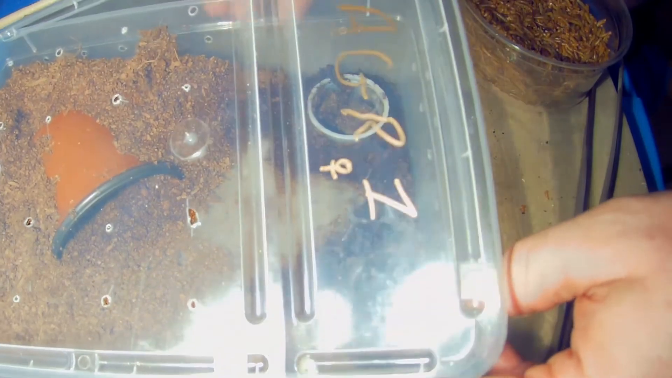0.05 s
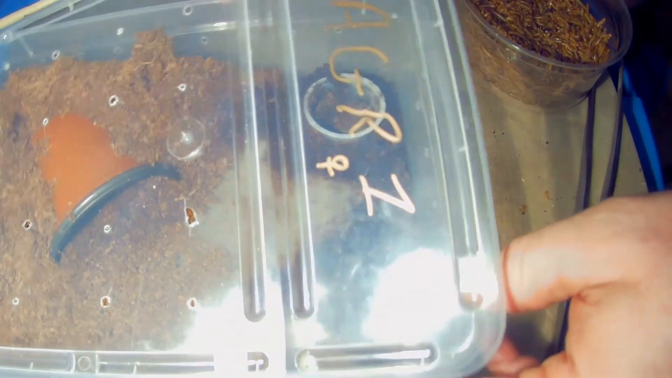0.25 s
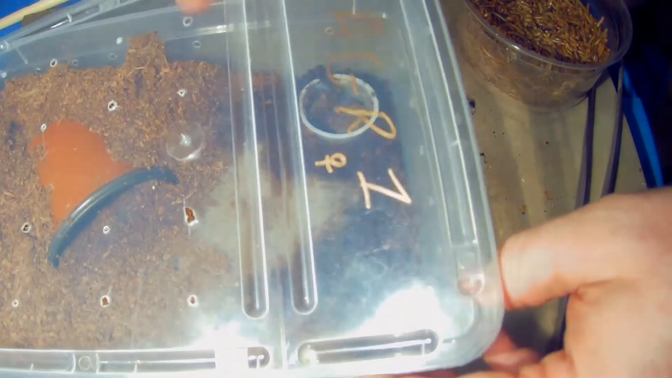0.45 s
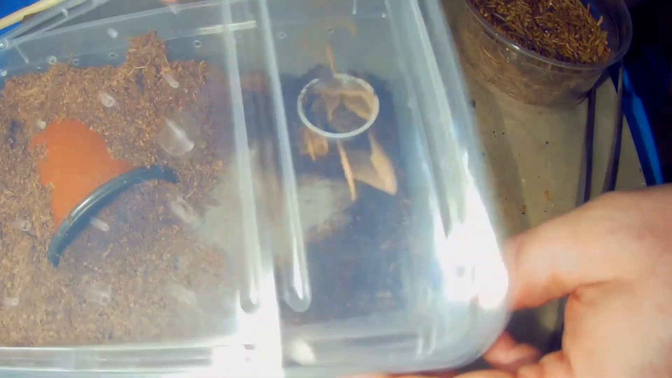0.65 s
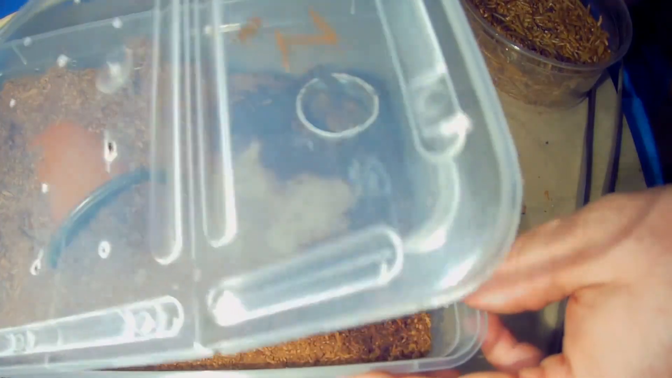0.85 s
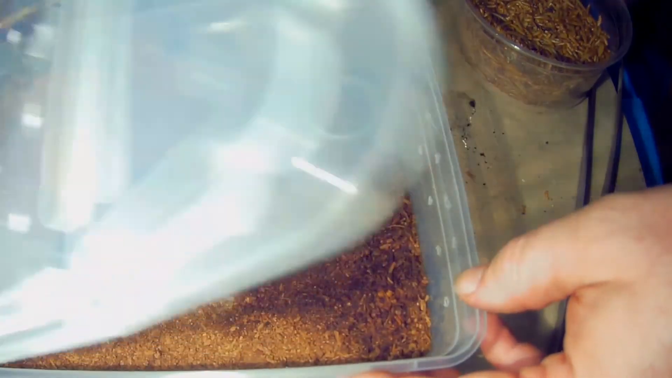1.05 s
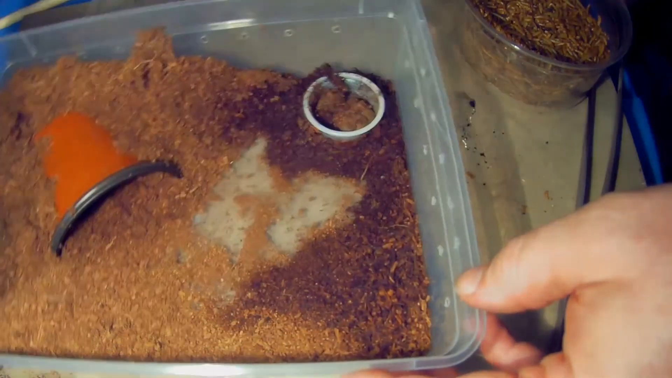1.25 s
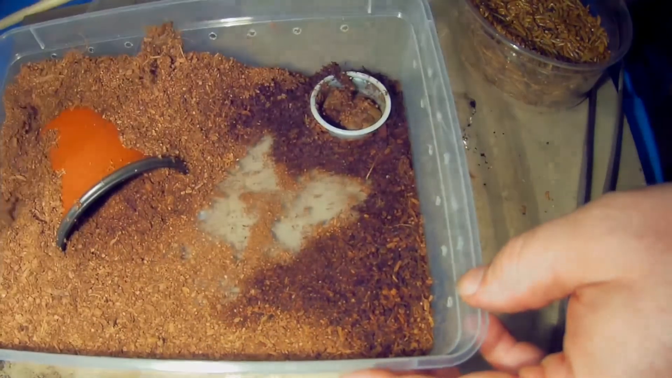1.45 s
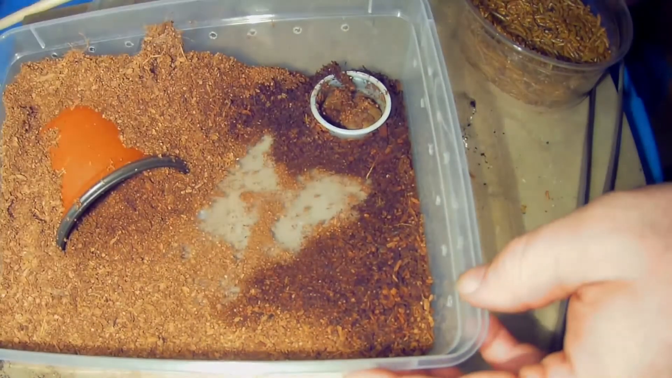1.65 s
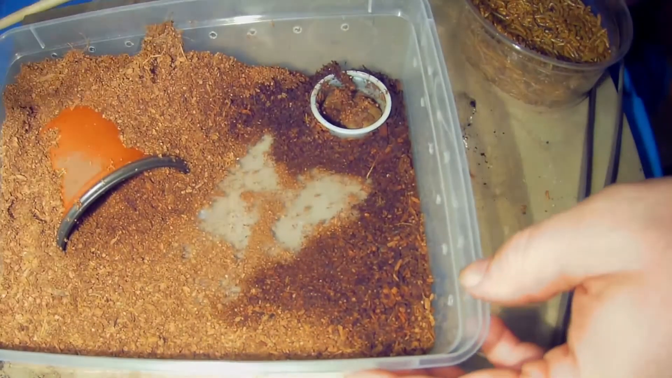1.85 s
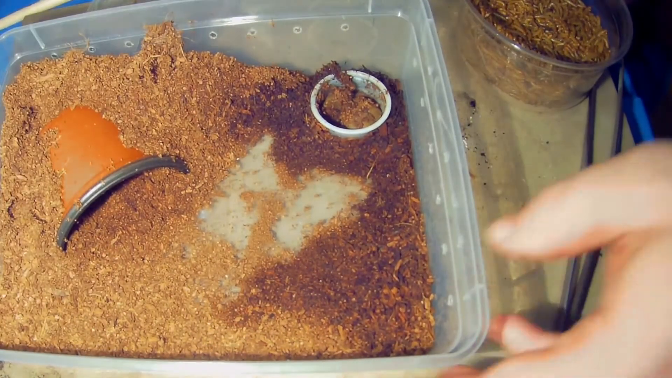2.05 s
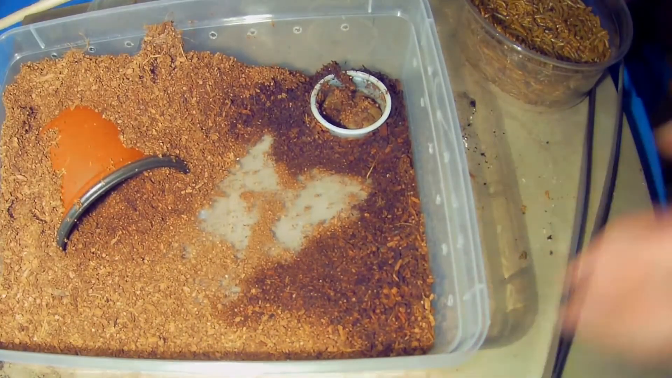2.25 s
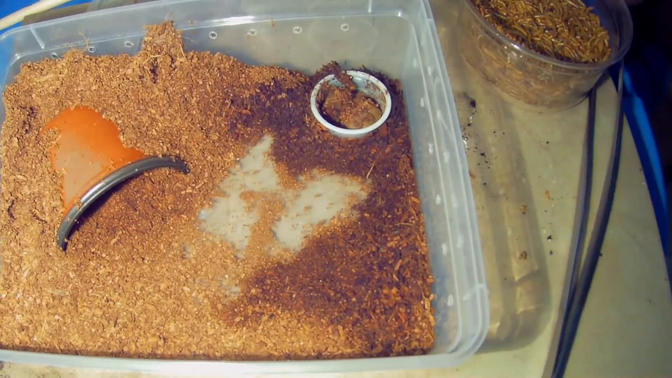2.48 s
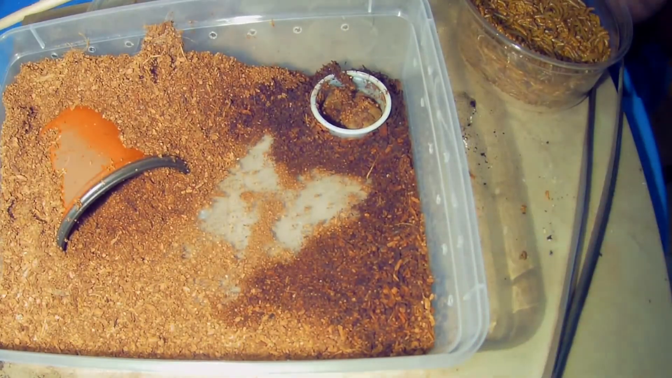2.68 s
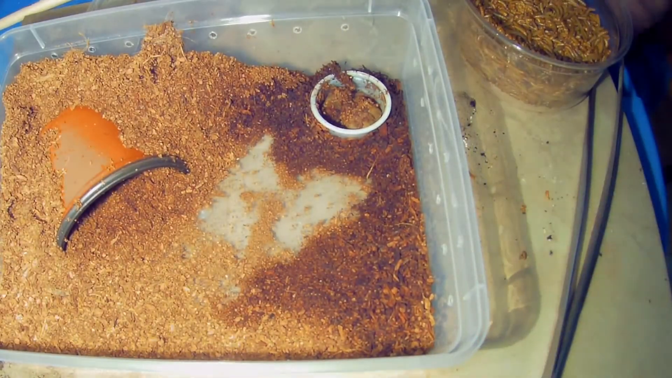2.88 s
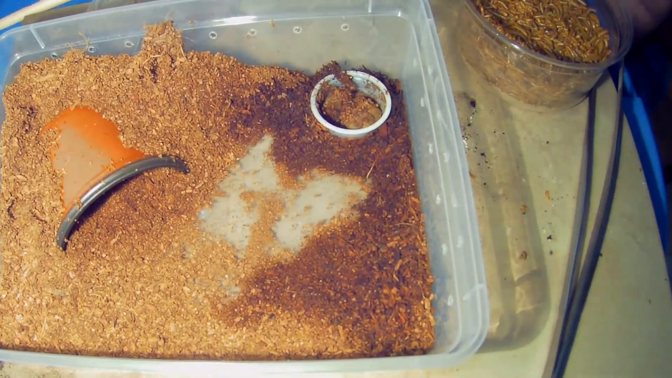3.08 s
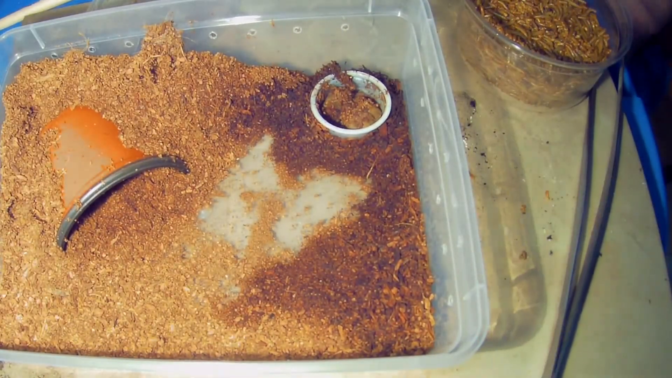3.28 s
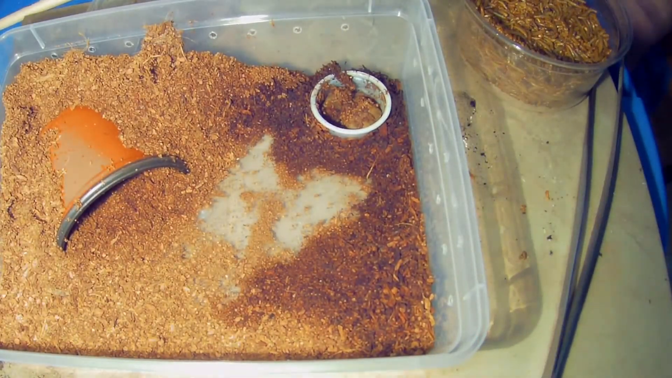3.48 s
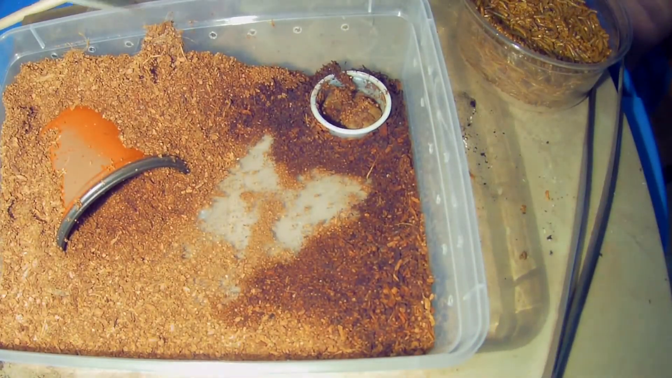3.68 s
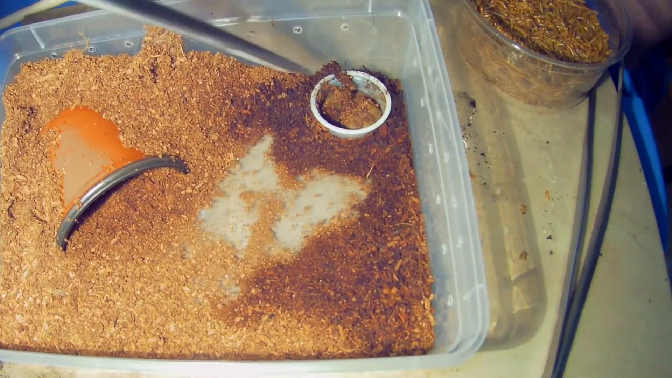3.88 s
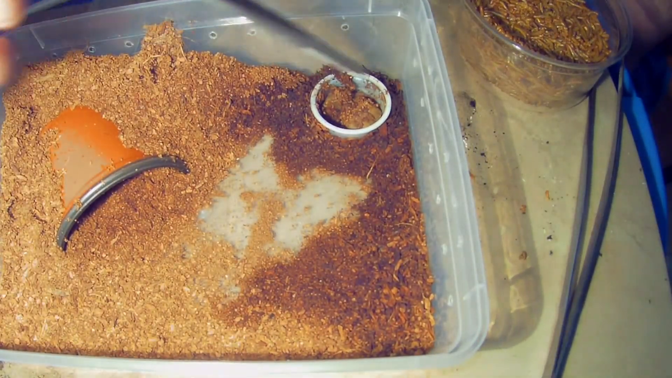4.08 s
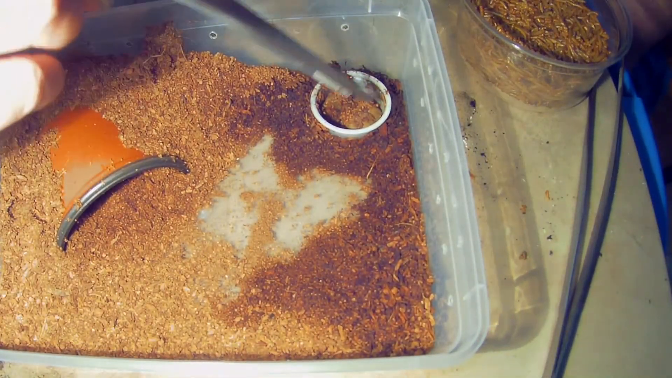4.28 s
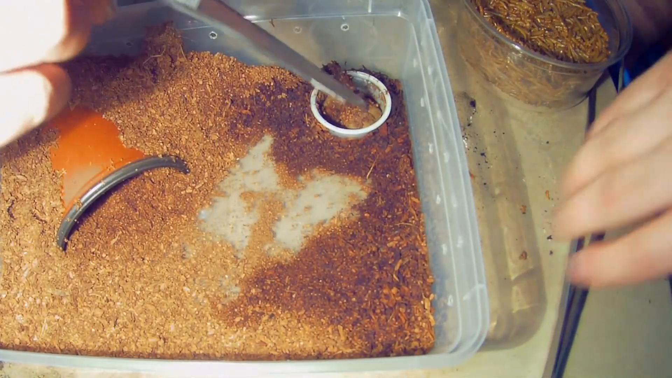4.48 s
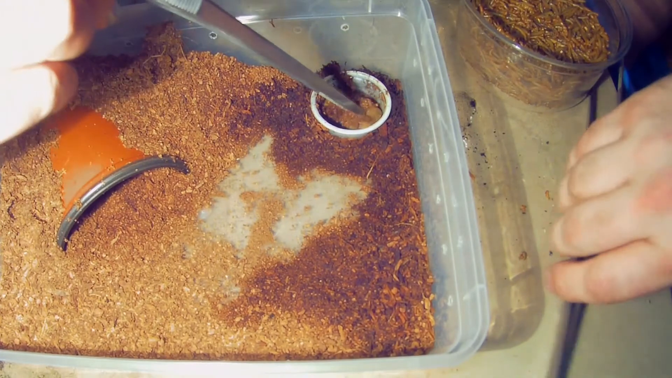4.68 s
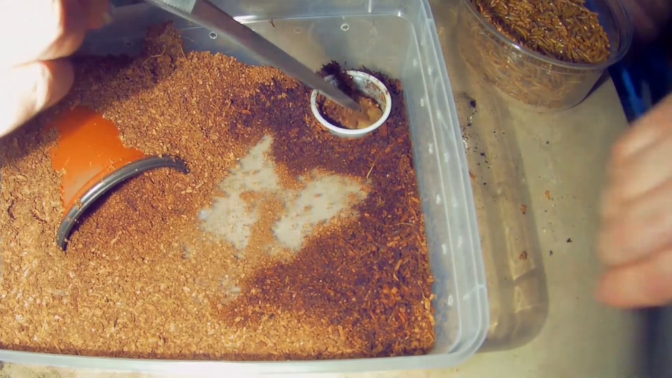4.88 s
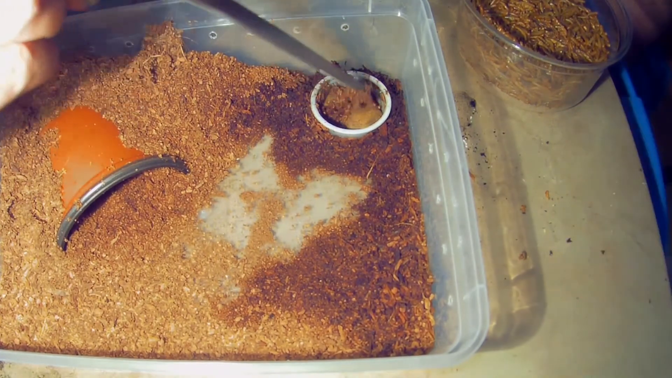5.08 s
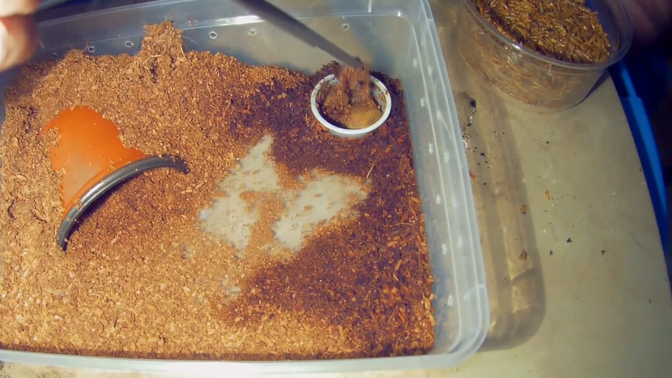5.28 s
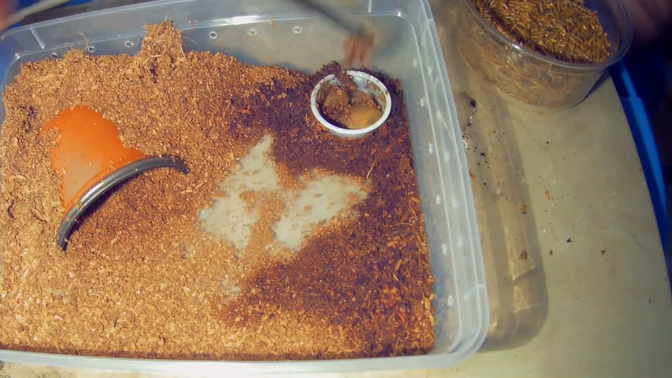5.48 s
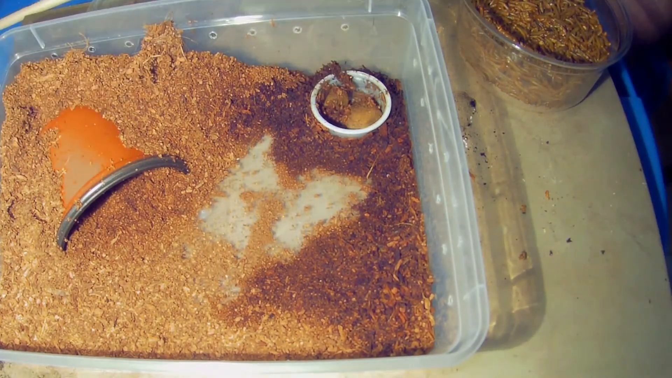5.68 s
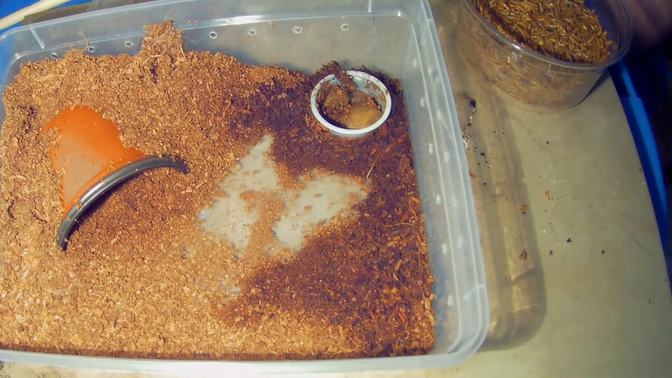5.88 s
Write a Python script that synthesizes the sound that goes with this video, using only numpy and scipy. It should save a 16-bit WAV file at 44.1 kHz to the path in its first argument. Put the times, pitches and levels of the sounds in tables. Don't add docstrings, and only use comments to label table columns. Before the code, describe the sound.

A close, dry indoor scene with a short room echo. Faint rumble, soft hiss, a wavering far engine hum and a barely audible high whine run throughout, the rumble stronger in the first two seconds. Faint skin-on-plastic rubs and tiny presses lead to a crisp triple plastic clip snap at about 0.67 seconds, with a small dull knock just after. A brief rub at 1.2 precedes bright, sharp cracks as the rim pulls free around 1.24. The loudest event, a hard, flat lid slam, lands at 1.4 and rattles, with a weaker shake at 1.5 and soft knocks until 1.7. Near quiet follows, with only faint rubs and a tiny tick at 3.05. Steel tongs knock lightly at 3.57 and land with a small clatter at 3.78. Faint high ticks come at 4.15, then a sharper bouncing steel tick at 4.66 and short dish scrapes to 4.8. Only background remains until about 5.9.

```python
import sys
import numpy as np
from scipy import signal
from scipy.fft import rfft, irfft
from scipy.io import wavfile
from scipy.ndimage import uniform_filter1d

SR = 44100
rng = np.random.default_rng(int(sys.argv[2]) if len(sys.argv) > 2 else 0)


def materialize(psi):
    bounded = np.clip(np.atleast_2d(psi).T, -1, 1)
    quanta = np.round(bounded * 32767).astype(np.int16)
    wavfile.write(sys.argv[1], SR, quanta)


def volts_from_decibels(level):
    exponent = np.asarray(level, float) / 20
    return 10 ** exponent


N = 262130

# (time [s], peak [dB], centre [Hz], rattle relative to the peak [dB])
CLIP_SNAPS = [
    (0.666, -41.5, 8300, -9),
    (0.6744, -23.5, 6600, -17),
    (0.6778, -23, 8100, -18),
    (0.6831, -25.5, 8000, -18),
]
LID_SNAPS = [
    (1.2126, -29.5, 8510, -21.5),
    (1.2354, -17.3, 10920, -22),
    (1.2431, -12.6, 7600, -28),
    (1.2509, -15.8, 8200, -27),
    (1.3967, -28.1, 7430, -20.5),
    (1.4027, -8, 9710, -23),
    (1.4052, -7.5, 8940, -23.5),
    (1.4902, -20.5, 8610, -24),
    (1.2436, -23, 4300, -19),
    (1.4036, -18, 4700, -24),
]
TONG_SNAPS = [
    (3.5608, -29, 9500, -13),
    (3.58, -28.7, 8240, -17),
    (3.7763, -26.5, 8100, -19),
    (3.7985, -24, 8000, -23),
    (3.8966, -46, 5500, -14),
]
FAINT_SNAPS = [(0.2636, -58.7, 5880, -9), (0.4602, -49.5, 6780, -13), (0.5646, -62.0, 7320, -20),
               (1.591, -45.2, 9800, -11), (3.0495, -57.8, 8660, -4.5), (4.428, -50.3, 7500, -19),
               (4.5627, -43.5, 9600, -20), (4.829, -47.5, 8400, -5)]
# (crack fade by 60 dB [s], rattle fade by 60 dB [s])
CLIP_EDGE = (.022, .14)
LID_EDGE = (.007, .08)
TONG_EDGE = (.0045, .23)
FAINT_EDGE = (.006, .12)

# (time [s], peak [dB], rattle relative to the peak [dB], rattle held [s])
CLIP_BLOWS = [
    (0.261, -55.5, 1.5, 0.004),
    (0.468, -61, -10, 0.009),
    (0.598, -58, -6, 0.03),
    (.6652, -41, 2.5, .046),
    (0.72, -35, -18, 0.008),
]
RIM_BLOWS = [
    (1.2348, -21.5, -24, .004),
    (1.2428, -29, -16, .004),
    (1.2506, -29.5, -15, .004),
]
SLAM = [
    (1.3962, -26, -14, .002),
    (1.4024, -10, -40, .001),
]
LID_BLOWS = [
    (1.411, -34, -2, .024),
    (1.64, -50.5, -13, 0.005),
    (1.717, -49.5, -15, 0.005),
    (2.039, -64, -15, 0.005),
]
LID_SHAKE = [
    (1.4893, -33, -15, .003),
    (1.5055, -37, -13, .006),
]
# (time [s], peak [dB], rattle [dB], held [s])
TONG_LIFT = [
    (3.5608, -39, -6.5, .014),
    (3.5797, -33, -9, .008),
]
TONG_DROP = [
    (3.776, -39, -7, 0.012),
    (3.788, -42, -1, .008),
    (3.7975, -34, -10, 0.022),
    (3.896, -52, -19, 0.004),
]
TIP_TICKS = [
    (4.134, -50, -10, .006),
    (4.147, -47, -9, .006),
    (4.17, -59, -6, .003),
]
STEEL_TICKS = [
    (4.651, -45, -18, .003),
    (4.6558, -27, -13, .003),
    (4.6665, -30, -16, .003),
    (4.6742, -31.5, -7.5, .003),
]
DISH_SLIPS = [
    (4.7155, -50, 0, .012),
    (4.73, -42.5, 0, .008),
    (4.759, -49, 0, .012),
    (4.772, -44.5, 0, .036),
]
DISH_TOUCH = [
    (4.655, -63, 0, .055),
    (4.7145, -46, -5, .01),
    (4.727, -46, -6, .005),
    (4.764, -47, -8, .006),
    (4.781, -46, -9, .004),
    (4.807, -45, -9, .02),
]
TABLE_TICK = [
    (3.047, -54, -5, 0.0039),
]

# (frequency [Hz], width [Hz], level [dB])
CLIP_BODY = [(81, 38, -5), (200, 60, -10), (300, 60, -11), (630, 75, 0), (790, 80, -7), (1120, 130, -14),
             (1430, 60, -14), (1960, 80, -20), (2510, 130, -20)]
RIM_BODY = [(118, 60, -4), (250, 80, 0), (480, 30, 3.5), (600, 90, 3), (1130, 120, -6), (1400, 80, -6),
            (2160, 130, -1), (2360, 74, -4), (4200, 400, -6)]
SLAM_BODY = [(231, 120, -5), (545, 90, 0), (980, 150, -12), (1250, 150, -13), (1850, 150, -13),
             (2280, 170, -8)]
LID_BODY = [(118, 15, -10), (205, 67, -3.5), (511, 42, 2), (1032, 52, -3), (1230, 49, -6), (1680, 47, -18),
            (1830, 12, -20.5), (1980, 110, -16.5), (2216, 140, -11.5)]
LIFT_BODY = [(202, 23, 7), (449, 44, 7.5), (724, 63, -1.5), (1290, 50, 4.5), (1464, 12, 6), (1760, 60, 1),
             (1960, 40, -14), (2230, 99, -12), (2380, 41, -8), (2830, 24, -28)]
DROP_BODY = [(228, 15, 0), (728, 29, 4), (1000, 17, -2.5), (1315, 14, 0), (1790, 20, -2), (1890, 27, -20),
             (2197, 23, 2.5), (2600, 31, -30.5), (3020, 33, -24)]
TIP_BODY = [(7700, 90, -8), (8500, 110, 0), (9150, 110, -2), (11500, 50, 0), (13000, 100, -14)]
STEEL_BODY = [(6000, 80, -29), (7070, 54, 2), (8040, 55, -2), (8700, 88, 7.5), (9540, 79, 10.5),
              (10670, 150, 2), (11630, 52, 6.5), (12500, 45, -1), (14100, 42, -17)]
DISH_BODY = [(300, 50, -19), (450, 50, -13), (576, 50, -7), (964, 36, -11), (1220, 22, -8), (1440, 24, 3),
             (1820, 45, -7), (2350, 41, -14), (2620, 40, -21)]
TICK_BODY = [(2120, 60, 0), (2350, 70, -1), (2650, 80, -4)]
# (weak modes [dB], widening by the hand [times], contact [s], rattle fade by 60 dB [s])
CLIP_GRIP = (-26, 1.6, .0008, .07)
RIM_GRIP = (-8, 1.8, .0003, .11)
SLAM_GRIP = (-16, 1.01, .0004, .04)
LID_GRIP = (-12, 2.2, .00035, .16)
SHAKE_GRIP = (-8, 2.2, .00012, .12)
LIFT_GRIP = (-8, 2.4, .0002, .21)
DROP_GRIP = (-12, 2.1, .00018, .2)
TIP_GRIP = (-20, 2.0, 4e-5, .09)
STEEL_GRIP = (-14, 3.0, 4e-5, .048)
DISH_GRIP = (-27, .8, .0003, .14)
TOUCH_GRIP = (-8, 2.6, .0005, .06)
TICK_GRIP = (-12, 2.2, .00029, .089)

# (loudest moment [s], rise [s], fall [s], peak [dB], centre
# [Hz])
RUBS = [(.144, .04, .08, -73, 7900), (.406, .036, .04, -61.5, 8100), (.466, .025, .025, -64, 7350),
        (.61, .022, .022, -66, 7100), (1.195, .06, .025, -58, 6500), (1.214, .02, .004, -49, 6600),
        (1.35, .02, .04, -61, 8450), (1.413, .003, .09, -41, 8600), (1.503, .005, .05, -57, 7900),
        (1.585, .04, .01, -63, 8900), (1.622, .02, .04, -64, 8300), (2.446, .066, .054, -72, 7900),
        (2.968, .04, .03, -69, 8050), (3.314, .05, .04, -71, 8400), (3.5, .1, .06, -71, 8600),
        (3.556, .016, .003, -64, 8900), (4.143, .012, .003, -62, 8850), (4.234, .025, .025, -73, 8400),
        (4.654, .005, .002, -49, 9100), (4.716, .01, .03, -59, 8200), (4.775, .018, .06, -57, 7100),
        (4.77, .11, .09, -61, 4250), (1.414, .004, .12, -48, 5200)]
# (frequency [Hz], level [dB])
BRIGHT = [(1470, -21.5), (2500, -10), (3240, -16), (5130, -5.5), (6710, -4), (7490, -7.5), (8910, -3.5),
          (11100, -11.5), (15200, -9), (16100, -20.5), (16500, -35)]
# (frequency [Hz], level [dB])
TREBLE_LIMIT = [(16700, 0), (16950, -60)]
# (frequency [Hz], fade by 60 dB [s])
ROOM = [(150, .25), (600, .2), (1400, .14), (2500, .11), (5000, .17), (9000, .2), (15000, .18)]
# (frequency [Hz], level [dB per Hz])
HISS = [(12, -40), (20, -4.5), (37, -8.5), (58, -2.5), (108, -5), (135, -2), (156, -13.5), (195, -9.5),
        (244, -14), (289, -10.5), (323, -15), (652, -15.5), (2660, -23.5), (15200, -26), (16500, -38.5)]
# (time [s], lift [dB])
RUMBLE = [(0, 5.5), (1.5, 6), (2.3, 1.5), (3.4, 2.9), (4.2, 2.9), (5.94, 1.5)]
# (start [s], end [s], first pitch [Hz], last pitch [Hz], level [dB])
ENGINE = [(0, 2.4, 71, 75, -71), (0, .55, 140, 140, -70), (0, 2.3, 293, 305, -78),
          (1.4, 3.6, 140, 129, -73), (1.85, 3.1, 103, 99, -73), (4.3, 5.94, 126, 123, -75)]


def evened(x):
    return x / np.sqrt(np.mean(x ** 2) + 1e-20)


def peaked(x):
    return x / (np.max(abs(x)) + 1e-20)


def read(points, hz):
    f, value = np.transpose(points)
    return np.interp(np.log(hz + 1), np.log(f + 1), value)


def add(mix, s, sound):
    part = mix[round(s * SR):][:len(sound)]
    part += sound[:len(part)]


def coloured(x, points):
    hz = np.fft.rfftfreq(len(x), 1 / SR)
    return irfft(rfft(x) * volts_from_decibels(read(points, hz)), len(x))


def resonate(x, hz, width):
    turn = np.exp(2j * np.pi * np.cumsum(hz * np.ones(len(x))) / SR)
    r = np.exp(-np.pi * width / SR)
    smooth = signal.lfilter([1 - r], [1, -r], x / turn)
    return 2 * (turn * smooth).real


def lumpy(count, lump_s, depth_db):
    white, slow = rng.standard_normal((2, count))
    lumps = evened(uniform_filter1d(slow, max(round(lump_s * SR), 1)))
    return evened(white * volts_from_decibels(depth_db * lumps))


def snap(peak_db, hz, crack, rattle_db, rattle):
    t = np.arange(2 ** 14) / SR
    fresh = rng.standard_normal(len(t))
    fresh[6] += 6.0
    first = coloured(fresh, BRIGHT) * volts_from_decibels(-60 * t / crack)
    first = peaked(first + 6.6 * resonate(first, hz, width=940))
    chatter = coloured(lumpy(len(t), lump_s=0.00128, depth_db=2.5), BRIGHT)
    chatter = evened(chatter + 1.5 * resonate(chatter, hz, width=1880))
    swell = volts_from_decibels(rattle_db - 60 * t / rattle) * np.minimum(t / 0.0043, 1)
    return volts_from_decibels(peak_db) * (first + chatter * swell)


def ring(force, body, fill_db, damping):
    hz = np.fft.rfftfreq(len(force), 1 / SR)
    edges = [.6 * body[0][0], min(1.1 * body[-1][0], 16000)]
    band = signal.butter(4, edges, "band", fs=SR, output="sos")
    gain = volts_from_decibels(fill_db) * signal.sosfreqz(band, hz, fs=SR)[1]
    for k, (mode_hz, width, db) in enumerate(body):
        wide = 1.55 * width * damping
        stage = 1j * hz * wide / (mode_hz ** 2 - hz ** 2 + 1j * hz * wide)
        gain = gain + (-1) ** k * volts_from_decibels(db) * stage ** 2
    return irfft(rfft(force) * gain, len(force))


def blow(body, fill_db, damping, contact, rattle, peak_db, rattle_db, hold):
    t = np.arange(2 ** 14) / SR
    push = -np.sin(np.pi * np.clip(t / contact, 0, 1))
    hit = peaked(ring(push, body, fill_db, damping))
    chatter = evened(ring(lumpy(len(t), lump_s=.004, depth_db=1.8), body, fill_db, damping))
    after = np.maximum(t - hold, 0) / rattle
    dull = uniform_filter1d(chatter, size=20)
    chatter = dull + (chatter - dull) * volts_from_decibels(-25 * after)
    swell = volts_from_decibels(rattle_db - 60 * after) * np.minimum(t / 0.0013, 1)
    return volts_from_decibels(peak_db) * (hit + chatter * swell)


def rub(rise, fall, peak_db, hz):
    t = np.arange(2 ** 13) / SR
    away = np.maximum(1 - t / rise, (t - rise) / fall)
    ends = np.clip(np.minimum(t / rise, 1 - away) * 5, 0, 1)
    grit = coloured(lumpy(len(t), lump_s=.004, depth_db=2.2), BRIGHT)
    grit = evened(grit + 2.8 * resonate(grit, hz, width=900))
    return volts_from_decibels(peak_db - 14 * away) * ends * grit


def add_snaps(mix, snaps, edge):
    crack, rattle = edge
    for s, peak_db, hz, rattle_db in snaps:
        add(mix, s - 8 / SR, snap(peak_db, hz, crack, rattle_db, rattle))


def add_blows(mix, blows, body, grip):
    for s, peak_db, rattle_db, hold in blows:
        add(mix, s, blow(body, *grip, peak_db, rattle_db, hold))


def tub_lid(mix):
    add_snaps(mix, CLIP_SNAPS, CLIP_EDGE)
    add_snaps(mix, LID_SNAPS, LID_EDGE)
    add_blows(mix, CLIP_BLOWS, CLIP_BODY, CLIP_GRIP)
    add_blows(mix, RIM_BLOWS, RIM_BODY, RIM_GRIP)
    add_blows(mix, SLAM, SLAM_BODY, SLAM_GRIP)
    add_blows(mix, LID_BLOWS, LID_BODY, LID_GRIP)
    add_blows(mix, LID_SHAKE, LID_BODY, SHAKE_GRIP)


def tongs_and_dish(mix):
    add_snaps(mix, TONG_SNAPS, TONG_EDGE)
    add_blows(mix, TONG_LIFT, LIFT_BODY, LIFT_GRIP)
    add_blows(mix, TONG_DROP, DROP_BODY, DROP_GRIP)
    add_blows(mix, TIP_TICKS, TIP_BODY, TIP_GRIP)
    add_blows(mix, STEEL_TICKS, STEEL_BODY, STEEL_GRIP)
    add_blows(mix, DISH_SLIPS, DISH_BODY, DISH_GRIP)
    add_blows(mix, DISH_TOUCH, DISH_BODY[:7], TOUCH_GRIP)


def hands_and_table(mix):
    for loudest, rise, fall, peak_db, hz in RUBS:
        add(mix, loudest - rise, rub(rise, fall, peak_db, hz))
    add_snaps(mix, FAINT_SNAPS, FAINT_EDGE)
    add_blows(mix, TABLE_TICK, TICK_BODY, TICK_GRIP)


def room(x):
    taps = np.zeros(SR // 2)
    at = np.arange(300, len(taps) - 20, 20)
    taps[at + rng.integers(0, 20, len(at))] = rng.choice([-1., 1.], len(at))
    hz, t, z = signal.stft(taps, SR, nperseg=256)
    fade = volts_from_decibels(-60 * t / read(ROOM, hz)[:, None])
    tail = signal.istft(z * fade, SR, nperseg=256)[1]
    return signal.fftconvolve(x, tail / np.linalg.norm(tail))[:N]


def engine():
    t = np.arange(N) / SR
    hum = np.zeros(N)
    for start, end, from_hz, to_hz, db in ENGINE:
        hz = np.interp(t, [start, end], [from_hz, to_hz])
        steady = np.sqrt(2) * np.sin(2 * np.pi * (np.cumsum(hz) / SR + rng.random()))
        waver = resonate(rng.standard_normal(N), hz, width=7.9)
        waver = evened(resonate(waver, hz, width=9.0))
        fade = np.clip(np.minimum(t - start, end - t) / .2 + .5, 0, 1)
        hum += volts_from_decibels(db) * fade * (.8 * steady + .55 * waver)
    return hum


def hiss_and_rumble():
    t = np.arange(N) / SR
    hiss = volts_from_decibels(-65.5) * evened(coloured(rng.standard_normal(N), HISS))
    low = signal.sosfiltfilt(signal.butter(1, 900, fs=SR, output="sos"), hiss)
    return hiss + low * (volts_from_decibels(np.interp(t, *np.transpose(RUMBLE))) - 1)


def whine():
    return volts_from_decibels(-85) * evened(resonate(rng.standard_normal(N), hz=6830, width=8.0))


def scene():
    near = np.zeros(N)
    tub_lid(near)
    tongs_and_dish(near)
    hands_and_table(near)
    background = engine() + hiss_and_rumble() + whine()
    return (near + volts_from_decibels(-15) * room(near) + background)[None]


def roll_off(x):
    return signal.sosfilt(signal.butter(12, 16960, fs=SR, output="sos"), x)


def record(dry):
    mix = coloured(dry[0], TREBLE_LIMIT)[None]
    return roll_off(mix)


dry = scene()
out = record(dry)
materialize(out)
```